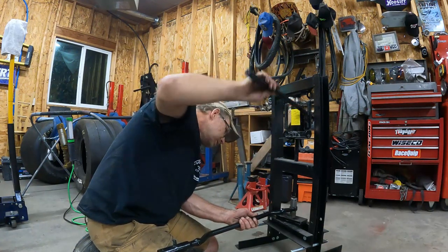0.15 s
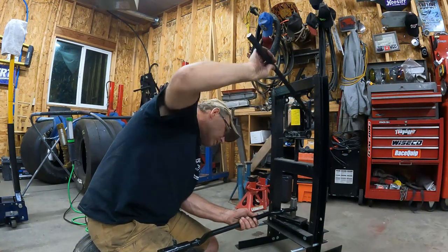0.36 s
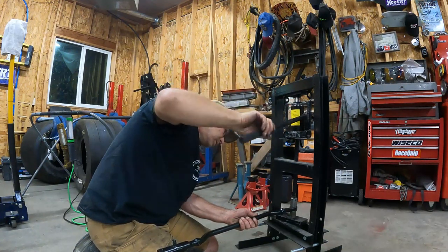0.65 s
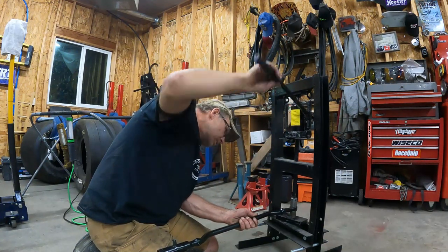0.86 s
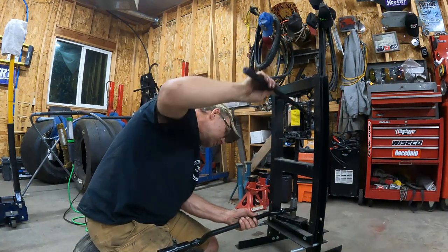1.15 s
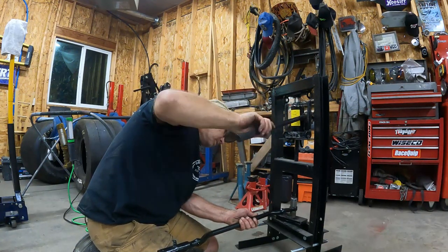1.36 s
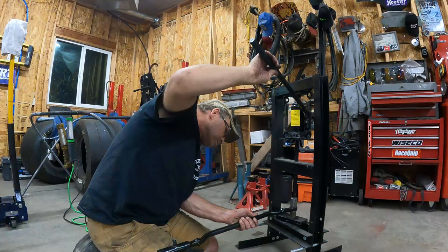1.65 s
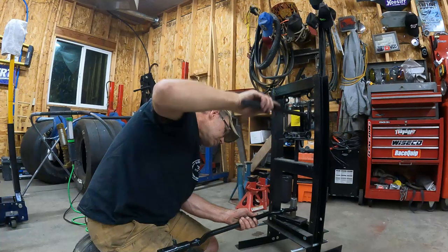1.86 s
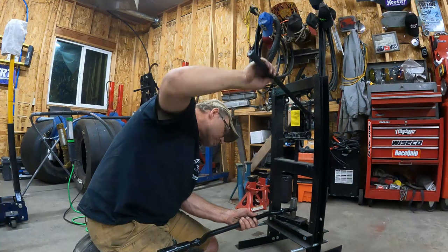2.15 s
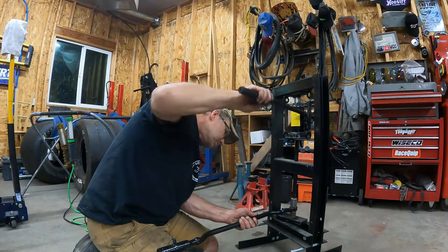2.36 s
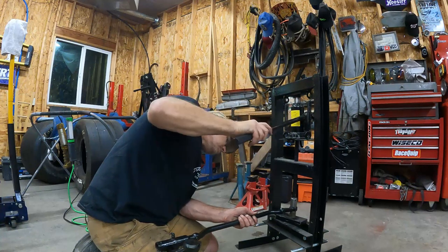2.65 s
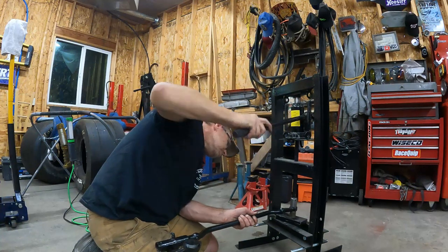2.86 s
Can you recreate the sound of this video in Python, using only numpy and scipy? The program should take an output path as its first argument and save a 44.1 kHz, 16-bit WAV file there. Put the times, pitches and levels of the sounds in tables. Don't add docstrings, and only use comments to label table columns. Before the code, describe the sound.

A hand-pumped hydraulic press clicks and clanks in quick strokes, its steel frame ringing in a garage

```python
import sys
import numpy as np
from scipy import signal
from scipy.fft import rfft, irfft
from scipy.io import wavfile
from scipy.ndimage import uniform_filter1d

SR = 44100
rng = np.random.default_rng(int(sys.argv[2]) if len(sys.argv) > 2 else 0)


def rack_gain(trim_db):
    fader = np.asarray(trim_db, float)
    return 10 ** (fader / 20)


def put_to_file(sound):
    columns = np.atleast_2d(sound).T
    safe = np.clip(columns, -1, 1)
    whole_steps = np.round(safe * 32767)
    wavfile.write(sys.argv[1], SR, whole_steps.astype(np.int16))


N = 132300
CHANGE_S = 1.7312
LEAD = round(0.3 * SR)
STRIKE_SCATTER_DB = 4


def evened(x):
    return x / np.sqrt(np.mean(x ** 2) + 1e-20)


def read(points, hz):
    f, value = np.transpose(points)
    return np.interp(np.log(hz + 1), np.log(f + 1), value)


def add(mix, start_s, sound):
    stretch = mix[int(start_s > CHANGE_S)]
    part = stretch[LEAD + round(start_s * SR):][:len(sound)]
    part += sound[:len(part)]


def ring(hz, modes, draws, rise_s, length=20000):
    t = np.arange(length) / SR
    level_db, t60_s = np.transpose(modes)[:, :, None]
    hz = np.array(hz)[:, None]
    turn = draws[:len(modes), None]
    luck = draws[20:20 + len(modes), None]
    beat_hz = (14 + 0.00602 * hz) * (0.409 + turn)
    beat = 1 + 1.23 * np.sin(2 * np.pi * (luck + turn + beat_hz * t))
    decay = rack_gain(level_db + STRIKE_SCATTER_DB * (2 * luck - 0.5) - 60 * t / t60_s)
    waves = decay * beat * np.sin(2 * np.pi * (hz * t + turn))
    onset = (1 - np.exp(-t / rise_s)) ** 2
    fade_out = np.minimum(1, 2 - 2 * t / t[-1])
    return waves.sum(0) * onset * fade_out


def burst(noise, colour, rise_s, fall_s):
    t = np.arange(len(noise)) / SR
    hz = np.fft.rfftfreq(len(noise), 1 / SR) + 1
    beyond_db = 20 * abs(np.log2(hz / np.clip(hz, colour[0][0], colour[-1][0])))
    tinted = irfft(rfft(noise) * rack_gain(read(colour, hz) - beyond_db), len(noise))
    shape = (1 - np.exp(-t / max(rise_s, 1e-4))) ** 2 * np.exp(-t / fall_s)
    return evened(tinted * shape) * np.sqrt(np.mean(shape ** 2))


# freq_hz, level_db
AIR_COLOUR = [(15, -28), (25, -6), (368, -3.5), (456, -8), (721, -9), (847, -14.5), (1230, -5.5),
              (4990, -22), (15400, -38)]
# freq_hz, correlation
AIR_LIKENESS = [(30, 0.17), (300, 0.29), (12000, 0.6)]
AIR_DB = -63.5


def air():
    frames = N // 256 + 5
    hz = np.fft.rfftfreq(1024, 1 / SR)
    a, b, c, d, patches = rng.standard_normal((frames, 513, 5)).T
    patches = uniform_filter1d(patches, size=12, axis=0)
    patches = evened(uniform_filter1d(patches, size=14, axis=1))
    same = np.clip(read(AIR_LIKENESS, hz), -1, 1)[:, None]
    left = a + 1j * b
    right = same * left + np.sqrt(1 - same ** 2) * (c + 1j * d)
    z = np.array([left, right]) * rack_gain(read(AIR_COLOUR, hz)[:, None] + 2 * patches)
    tone = signal.istft(z, nperseg=1024, noverlap=768)[1][:, :N]
    return rack_gain(AIR_DB) * evened(tone)


# freq_hz, t60_s
GARAGE_T60 = [(300, 0.69), (1200, 0.36), (3000, 0.51), (6000, 0.49), (12000, 0.4)]
# freq_hz, level_db
WALL_COLOUR = [(150, 1), (300, 1.5), (400, -9), (520, -2), (800, 7), (960, -7), (1200, 1), (8000, 0)]
# freq_hz, level_db
ECHO_SIDE = [(400, -8.5), (2000, -3), (5000, -7), (12000, -3.5)]


def garage(x):
    taps = np.zeros((2, SR // 2))
    at = np.arange(140, SR // 2 - 20, 20)
    places = at + rng.integers(0, 20, (2, len(at)))
    np.put_along_axis(taps, places, rng.choice([-1., 1.], (2, len(at))), 1)
    hz, t, (mid, side) = signal.stft(taps, SR, nperseg=256)
    side = side * rack_gain(read(ECHO_SIDE, hz))[:, None]
    echo_db = read(WALL_COLOUR, hz)[:, None] - 60 * t / read(GARAGE_T60, hz)[:, None]
    tail = signal.istft(np.array([mid + side, mid - side]) * rack_gain(echo_db), SR, nperseg=256)[1]
    tail = tail / np.linalg.norm(tail[0])
    return signal.fftconvolve(x[None], tail, axes=1)[:, LEAD:LEAD + N]


# time_s, level_db
RUSTLE_LEVEL = [
    (2.497, -92),
    (2.678, -70),
    (2.8, -69.5),
    (3, -79.5),
]


def rustle(mix):
    time_s, level_db = np.transpose(RUSTLE_LEVEL)
    cloth = burst(rng.standard_normal(SR), FIZZ_COLOUR, 0, np.inf)
    level = rack_gain(np.interp(time_s[0] + np.arange(SR) / SR, time_s, level_db))
    add(mix, time_s[0], cloth * level)


# start_s, level_db
STAND_THUMPS = [
    (.02, -64),
    (0.59, -48.5),
    (1.243, -58),
    (2.062, -59),
    (2.643, -53),
]
# freq_hz, level_db
THUMP_COLOUR = [(35, -8), (70, -6), (170, -34)]


def stand(mix):
    for start_s, level_db in STAND_THUMPS:
        noise = rng.standard_normal(16384)
        add(mix, start_s, rack_gain(level_db) * burst(noise, THUMP_COLOUR, 0.011, 0.022))


HOLLOW_PITCHES = [205, 268, 330, 398, 485, 592, 1303, 1459, 985, 1087, 540]
# level_db, t60_s
HOLLOW_MODES = [(-2.5, 0.2), (-6, 0.32), (-15.5, 1.6), (-14, 0.66), (-6, 0.84), (-9, 0.35), (-15.5, 0.44),
                (-8.5, 0.13), (-15, 0.44), (-12, 0.36), (-15, 0.67)]
# freq_hz, level_db
BLOW_COLOUR = [(90, -28), (260, 6), (800, -6), (1500, 1), (3000, -26.5)]
# freq_hz, level_db
DRONE_COLOUR = [(110, -32), (190, 2), (330, 0), (500, 1.5), (700, -6), (900, -37)]
THUD_S, THUD_DB, THUD_RISE_S = 2.588, -41, 0.00047
BLOW_DB, BLOW_FALL_S = -42, 0.062
REBOUND_DELAY_S, REBOUND_DB, REBOUND_RISE_S = 0.05, -8, 0.016
DRONE_DB, DRONE_RISE_S, DRONE_FALL_S = -45, 0.0029, 0.11


def thud(mix):
    modes = ring(HOLLOW_PITCHES, HOLLOW_MODES, rng.random(48), THUD_RISE_S, length=40000)
    blow_noise, rebound_noise = rng.standard_normal((2, 16384))
    blow = burst(blow_noise, BLOW_COLOUR, THUD_RISE_S, BLOW_FALL_S)
    rebound = burst(rebound_noise, BLOW_COLOUR, REBOUND_RISE_S, BLOW_FALL_S)
    drone = burst(rng.standard_normal(32768), DRONE_COLOUR, DRONE_RISE_S, DRONE_FALL_S)
    add(mix, THUD_S, rack_gain(THUD_DB) * modes)
    add(mix, THUD_S, rack_gain(BLOW_DB) * blow)
    add(mix, THUD_S + REBOUND_DELAY_S, rack_gain(BLOW_DB + REBOUND_DB) * rebound)
    add(mix, THUD_S, rack_gain(DRONE_DB) * drone)


# start_s, pitch_hz, level_db, t60_s
LOOSE_PINGS = [(.244, 2057, -31, 0.034), (.243, 1039, -30, 0.047), (.301, 4340, -27.5, 0.062),
               (.522, 1890, -27.5, 0.033), (.5605, 1037, -28, 0.022), (0.569, 1320, -25, 0.015),
               (0.839, 1130, -38.5, 0.013), (.872, 2220, -33.5, 0.038), (.893, 1047, -34.5, 0.027),
               (.901, 2075, -34, 0.034), (0.914, 3200, -42, .1), (.932, 1870, -46, 0.035),
               (.9405, 2044, -22.5, 0.018), (0.946, 3260, -52, 0.06), (1.087, 1902, -23.5, 0.013),
               (1.1755, 1860, -34, 0.03), (1.1945, 1896, -30, 0.014), (1.2283, 2020, -33.5, 0.037),
               (1.238, 1053, -29.5, 0.043), (1.238, 5670, -35, .02), (1.25, 1030, -46, .06),
               (1.573, 2334, -36, 0.043), (1.598, 3480, -26, 0.04), (1.654, 1934, -28, 0.031),
               (1.8535, 2040, -41, .07), (1.873, 1027, -35, 0.031), (1.888, 2280, -40, 0.035),
               (1.922, 2913, -34, .06), (1.955, 2173, -31, 0.042), (1.955, 3532, -36, 0.06),
               (1.979, 1040, -32, .06), (2.03, 4020, -27, 0.019), (2.055, 4190, -49, 0.042),
               (2.22, 5570, -62, 0.023), (2.226, 3310, -53, .06), (2.272, 4740, -42, 0.02),
               (2.281, 4670, -48, 0.017), (2.323, 1013, -31.5, 0.065), (2.335, 9300, -60, 0.097),
               (2.3345, 7800, -57, 0.017)]
PARTNER_SPLIT, PARTNER_DB = 0.035, -5.5


def pings(mix):
    t = np.arange(8000) / SR
    for start_s, pitch_hz, level_db, t60_s in LOOSE_PINGS:
        main = np.sin(2 * np.pi * pitch_hz * t)
        partner = rack_gain(PARTNER_DB) * np.sin(2 * np.pi * pitch_hz * (1 + PARTNER_SPLIT) * t)
        onset = (1 - np.exp(-t / (0.045 * t60_s))) ** 2
        add(mix, start_s, (main + partner) * rack_gain(level_db - 60 * t / t60_s) * onset)


BED_PITCHES = [920, 1022, 1240, 1322, 1482, 1770, 2058]
# level_db, t60_s
BED_MODES = [(-5.5, 0.76), (0, 0.48), (-8, 0.51), (-4, 0.73), (-8.5, 0.82), (-11, 0.75), (-5.5, 0.65)]
SQUEAL_S, SQUEAL_DB = 0.64, -58.5


def squeal(mix):
    tones = ring(BED_PITCHES[3:5], [(0, 0.96), (1, 0.9)], rng.random(48), 0.012)
    colour = list(zip(BED_PITCHES[2:6], [-18, -14, -4, -19]))
    rough = burst(rng.standard_normal(SR // 2), colour, 0.006, 0.2)
    add(mix, SQUEAL_S, rack_gain(SQUEAL_DB) * tones)
    add(mix, SQUEAL_S, rack_gain(SQUEAL_DB) * rough)


# start_s, crack_db, fizz_db, contact_s
LINKAGE_CLANKS = [(0.207, -35.5, -41, 0.016), (0.2552, -36, -45.5, 0.0045), (0.2985, -22.5, -33, 0.0036),
                  (0.5155, -39.5, -79, 0.0048), (0.5419, -34.5, -39.5, 0.0045),
                  (0.5601, -31.5, -34, 0.0036), (0.861, -40, -37, 0.011), (0.9129, -42.5, -48, 0.0045),
                  (0.9383, -23.5, -38.5, 0.0043), (1.0865, -37, -58, 0.0052), (1.1953, -47, -62, 0.006),
                  (1.208, -32.5, -37, 0.0098), (1.2385, -34.5, -34.5, 0.0035), (1.5656, -43.5, -43, 0.012),
                  (1.5986, -29, -41, 0.0041), (1.6528, -27.5, -38.5, 0.0039), (1.8217, -41, -77, 0.0032),
                  (1.9221, -36, -40, 0.0016), (1.954, -37, -64, 0.0037), (1.9788, -51, -46, 0.0082),
                  (2.0283, -28.5, -55, 0.0044), (2.22, -48, -79, 0.0083), (2.2781, -42, -54, 0.011),
                  (2.311, -40.5, -55, 0.013), (2.589, -40, -71, 0.0067), (2.6659, -47.5, -56, 0.015)]
# freq_hz, level_db
CRACK_COLOUR = [(880, -11.5), (1500, -2), (2040, -3), (2790, -2.5), (3980, -3), (9000, -29.5), (11700, -67),
                (19800, -120)]
# freq_hz, level_db
FIZZ_COLOUR = [(2650, -70), (4500, -0.5), (6070, -3.5), (8670, -13), (9360, -15.5), (12300, -22.5),
               (15400, -43)]
FRAME_PITCHES = [3058, 3238, 3427, 3877, 3982, 4160, 4229, 4381, 4630, 5286]
# level_db, t60_s
FRAME_MODES = [(-6, 0.25), (-1.5, 0.27), (2.5, 0.06), (-14, 0.099), (-15, 0.065), (-9.5, 0.3), (-6.5, 0.18),
               (-26, 0.083), (-56, 0.077), (-12, 0.053)]
# freq_hz, level_db
SHIMMER_COLOUR = [(2500, -19), (3300, 4.5), (4400, -3), (5500, -6.5), (9000, -23.5), (13000, -32)]
FRAME_DB, SHIMMER_DB, SHIMMER_FALL_S = -22.5, -19, 0.023
EARLIER_S, EARLIER_DB = -0.18, -29.5


def linkage(mix):
    earlier = (EARLIER_S, EARLIER_DB, EARLIER_DB + 1.5, 0.006)
    for start_s, crack_db, fizz_db, contact_s in list(LINKAGE_CLANKS) + [earlier]:
        rise_s = 30 * contact_s ** 2
        draws = rng.random(48)
        noise = rng.standard_normal((2, 4096))
        crack = burst(noise[0], CRACK_COLOUR, rise_s, contact_s)
        fizz = burst(noise[1], FIZZ_COLOUR, rise_s, contact_s)
        frame = ring(FRAME_PITCHES, FRAME_MODES, draws, rise_s, length=22000)
        shimmer = burst(noise.ravel(), SHIMMER_COLOUR, rise_s + 0.0031, SHIMMER_FALL_S)
        add(mix, start_s, rack_gain(crack_db) * crack + rack_gain(fizz_db) * fizz)
        add(mix, start_s, rack_gain(crack_db + FRAME_DB) * frame)
        add(mix, start_s, rack_gain(crack_db + SHIMMER_DB) * shimmer)
    add(mix, EARLIER_S, rack_gain(EARLIER_DB - 23) * ring(BED_PITCHES, BED_MODES, rng.random(48), 0.0022))


# start_s, low_db, low_hz, upper_db, contact_s
EARLY_KNOCKS = [(0.187, -39.5, 1010, -53.5, 0.00086), (0.215, -35, 1030, -35, 0.0033),
                (0.238, -39, 1016, -37, 0.0033), (0.299, -35, 971, -39, 0.0064),
                (0.516, -37.5, 1170, -56, 0.0011), (0.523, -43.5, 1037, -38.5, 0.0033),
                (0.559, -31, 1005, -37, 0.00022), (0.572, -41.5, 1060, -36.5, 0.00052),
                (0.84, -44.5, 1063, -53, 0.0067), (0.869, -37, 1011, -36.5, 0.0031),
                (0.89, -39.5, 974, -37.5, 0.0066), (0.938, -33.5, 969, -32.5, 0.0038),
                (1.087, -44.5, 980, -35.5, 0.0015), (1.176, -43, 1100, -53, 0.0012),
                (1.194, -38.5, 1036, -39, 0.0023), (1.228, -40, 1018, -45, 0.0022),
                (1.541, -43.5, 1037, -49, 0.0039), (1.575, -37.5, 960, -44, 0.0044),
                (1.598, -33, 996, -36.5, 0.0012), (1.656, -35.5, 961, -41, 0.0079)]
# start_s, low_db, low_hz, upper_db, contact_s
LATE_KNOCKS = [(1.823, -33.5, 1017, -39.5, 0.0004), (1.884, -43.5, 1188, -43, 0.00073),
               (1.922, -42.5, 1050, -38, 0.0041), (1.954, -34, 1025, -43, 0.0008),
               (2.028, -36.5, 1001, -54, 0.00067), (2.278, -36.5, 1075, -47, 0.0056),
               (2.312, -42.5, 1016, -41, 0.0023), (2.967, -48, 1134, -62, 0.0035)]
# freq_hz, level_db
HUM_COLOUR = [(90, -57), (150, 3), (300, 1.5), (600, -9.5), (800, -22)]
LOW_T60_S, LOW_SPLIT = 0.067, 0.077
UPPER_T60_S, UPPER_HZ, UPPER_SPREAD = 0.026, 2077, 0.011
BED_DB, HUM_DB, HUM_RISE_S, HUM_FALL_S = -20, -12.5, 0.006, 0.046


def handle(mix):
    for start_s, low_db, low_hz, upper_db, contact_s in list(EARLY_KNOCKS) + list(LATE_KNOCKS):
        draws = rng.random(48)
        noise = rng.standard_normal(16384)
        upper_hz = UPPER_HZ * (1 + UPPER_SPREAD * (2 * draws[45] - 1))
        pitches = [low_hz, low_hz * (1 + LOW_SPLIT), upper_hz]
        modes = [(low_db, LOW_T60_S), (low_db - 3, LOW_T60_S), (upper_db, UPPER_T60_S)]
        add(mix, start_s, ring(pitches, modes, draws, contact_s, length=4000))
        colour = [(upper_hz / 2, -55), (upper_hz, 0), (2 * upper_hz, -65)]
        rattle = burst(noise[:4096], colour, contact_s / 10, UPPER_T60_S / np.log(1000))
        add(mix, start_s, rack_gain(upper_db) * rattle)
        add(mix, start_s, rack_gain(low_db + BED_DB) * ring(BED_PITCHES, BED_MODES, draws, 0.00022))
        add(mix, start_s, rack_gain(low_db + HUM_DB) * burst(noise, HUM_COLOUR, HUM_RISE_S, HUM_FALL_S))


LEFT_LAG_SAMPLES, LEFT_DB, WET_DB = 0.65, -1, -4


def late(x):
    turn = np.exp(-2j * np.pi * np.fft.rfftfreq(len(x)) * LEFT_LAG_SAMPLES)
    return irfft(rfft(x) * turn, len(x))


def in_room(press):
    direct = np.array([late(press)[LEAD:], press[LEAD:]])
    return direct + rack_gain(WET_DB) * garage(press)


def scene():
    mix = np.zeros((2, LEAD + N))
    for source in (rustle, stand, thud, pings, squeal, linkage, handle):
        source(mix)
    before, after = [in_room(press) for press in mix]
    kept = np.clip((CHANGE_S - np.arange(N) / SR) / 0.00057, 0, 1)
    balance = rack_gain(np.array([[LEFT_DB / 2], [-LEFT_DB / 2]]))
    return (before * kept + after) * balance + air()


def low_pass(x):
    return signal.sosfilt(signal.butter(12, 15600, fs=SR, output="sos"), x)


def record(dry):
    heard = signal.sosfilt(signal.butter(2, 40 / SR * 2, "high", output="sos"), dry)
    limited = 0.2 * np.tanh(heard / 0.2)
    heard = signal.sosfilt(signal.butter(6, 15000 / SR * 2, output="sos"), limited)
    return low_pass(heard)


dry = scene()
out = record(dry)
put_to_file(out)
```